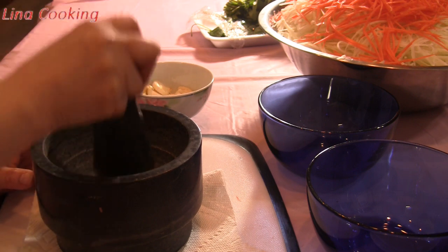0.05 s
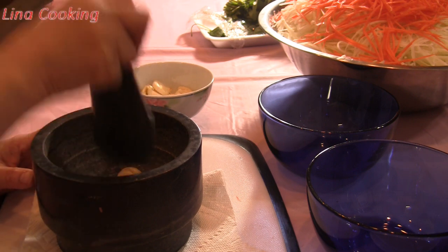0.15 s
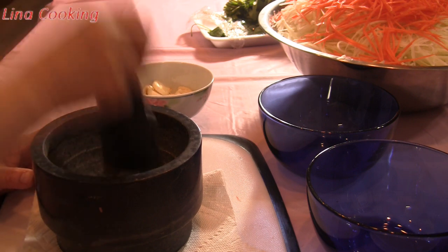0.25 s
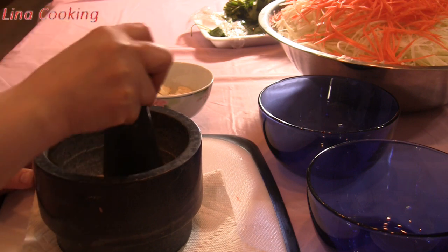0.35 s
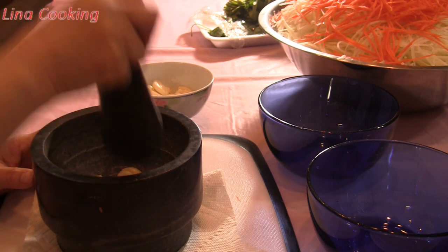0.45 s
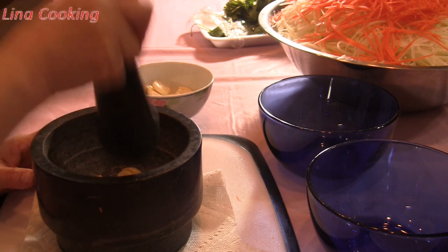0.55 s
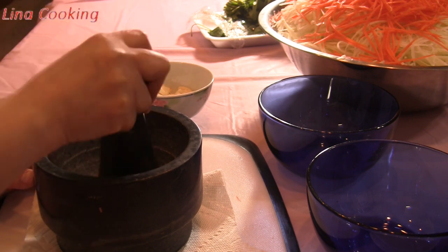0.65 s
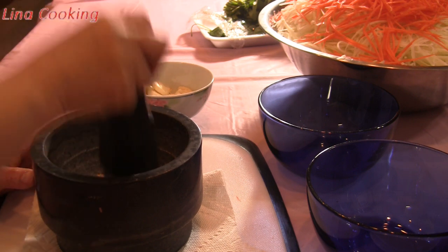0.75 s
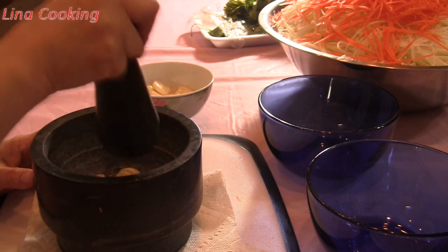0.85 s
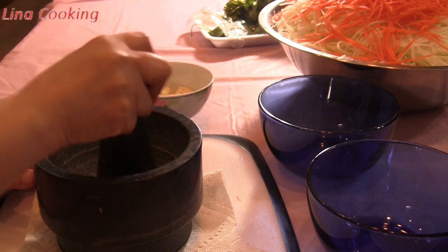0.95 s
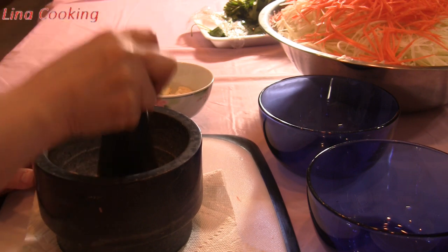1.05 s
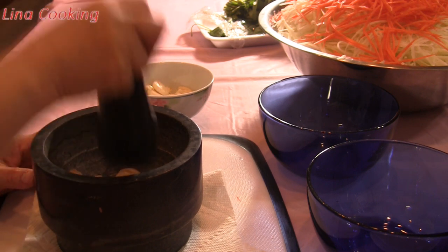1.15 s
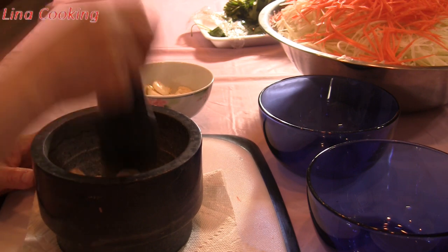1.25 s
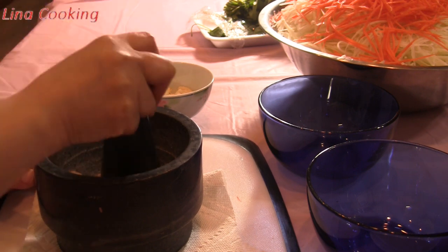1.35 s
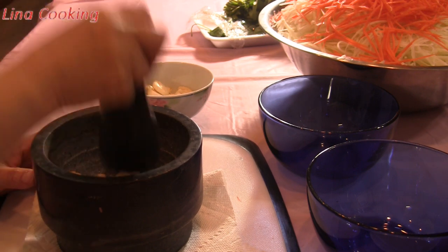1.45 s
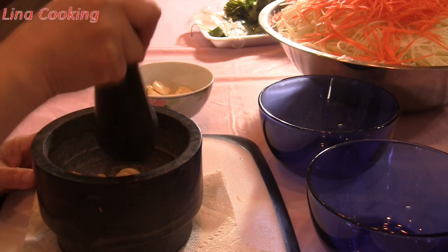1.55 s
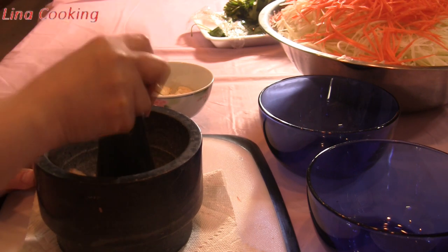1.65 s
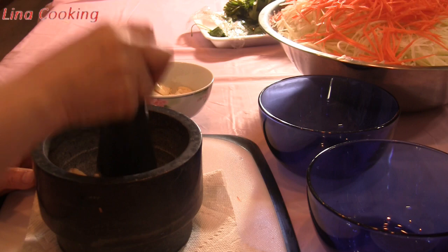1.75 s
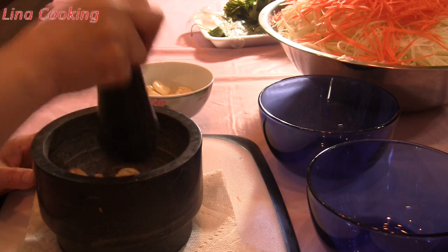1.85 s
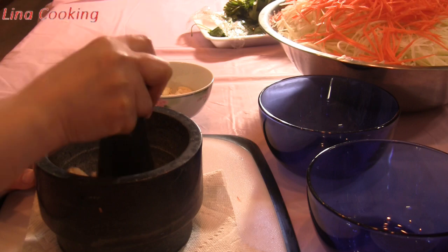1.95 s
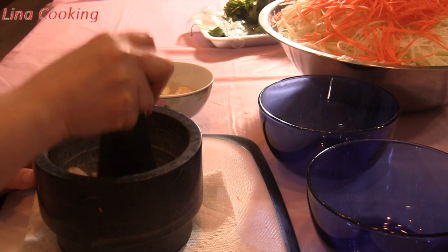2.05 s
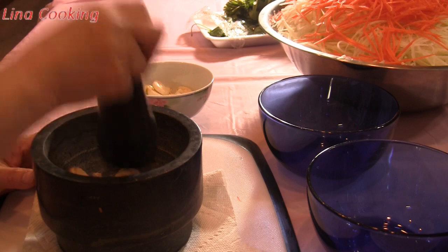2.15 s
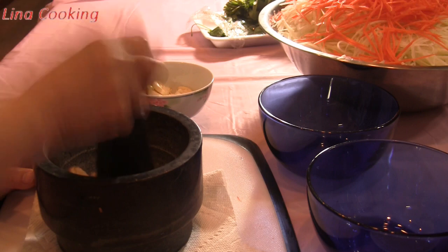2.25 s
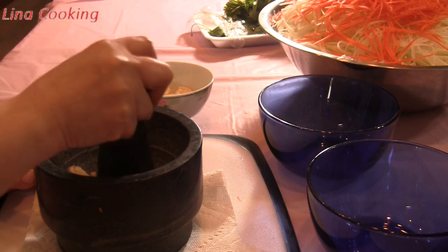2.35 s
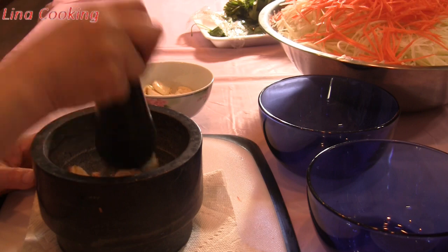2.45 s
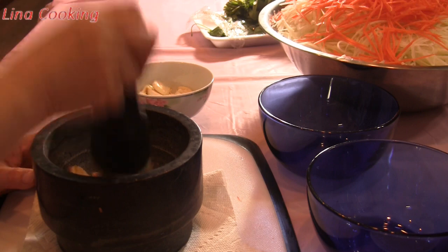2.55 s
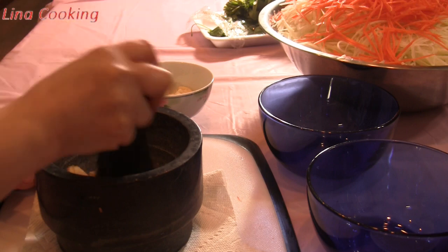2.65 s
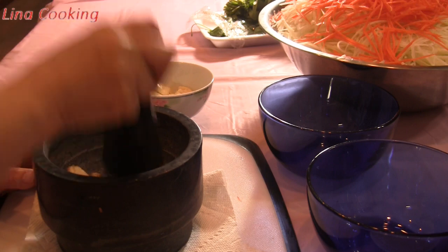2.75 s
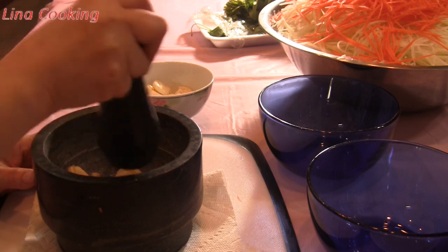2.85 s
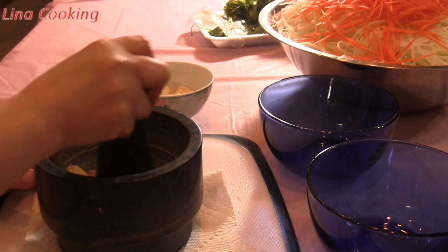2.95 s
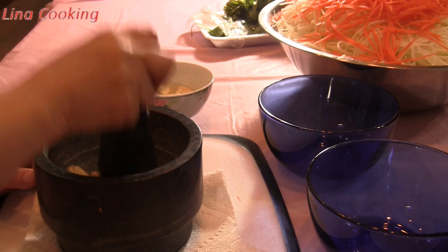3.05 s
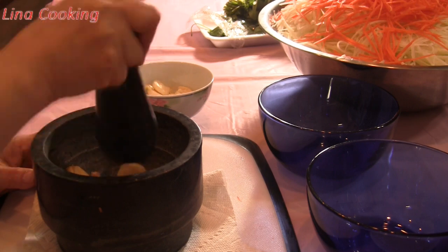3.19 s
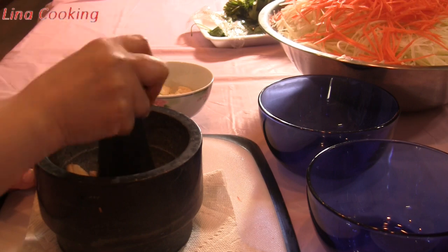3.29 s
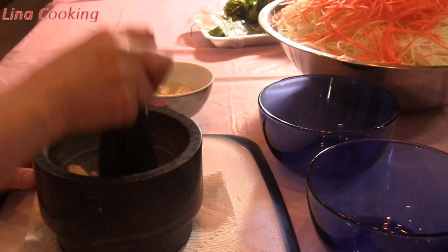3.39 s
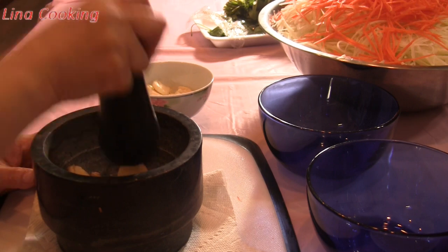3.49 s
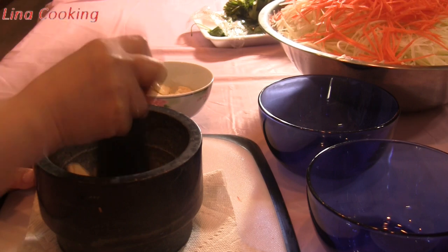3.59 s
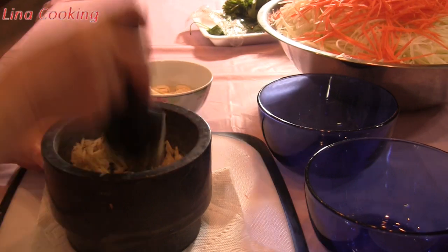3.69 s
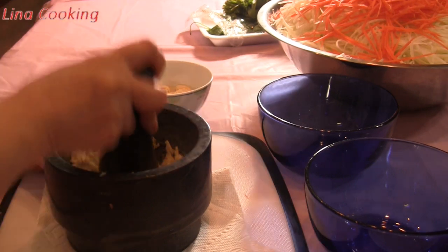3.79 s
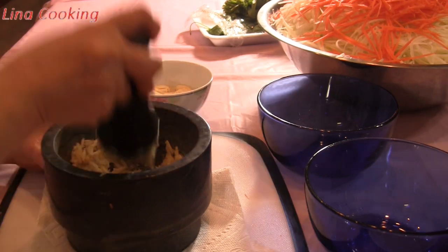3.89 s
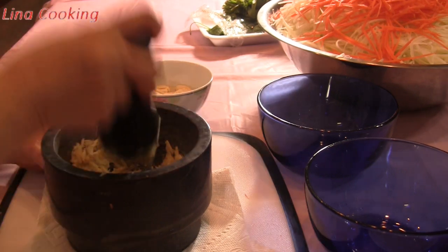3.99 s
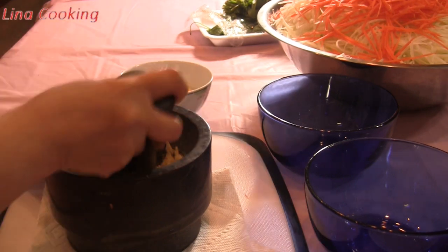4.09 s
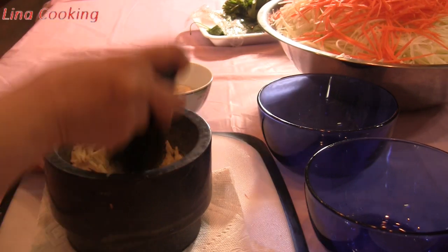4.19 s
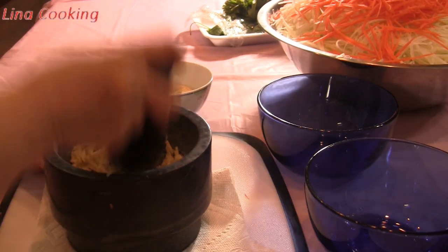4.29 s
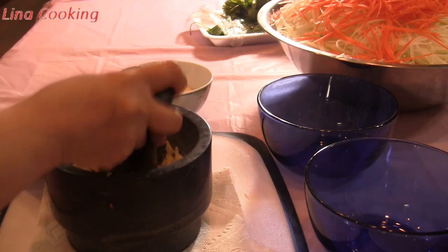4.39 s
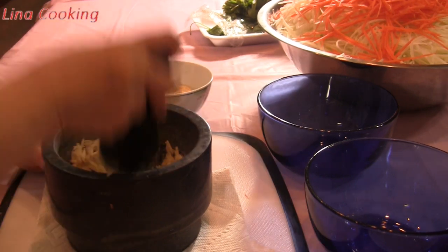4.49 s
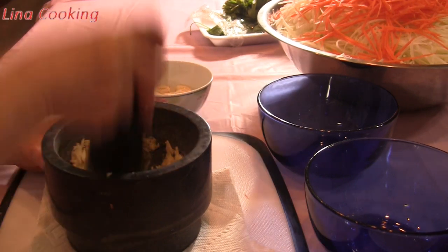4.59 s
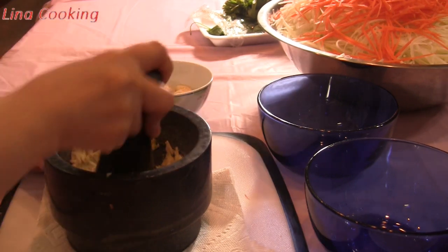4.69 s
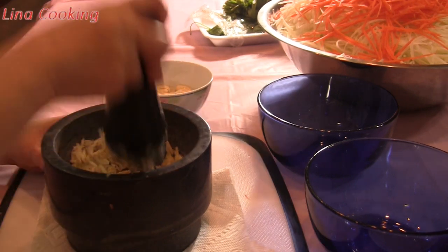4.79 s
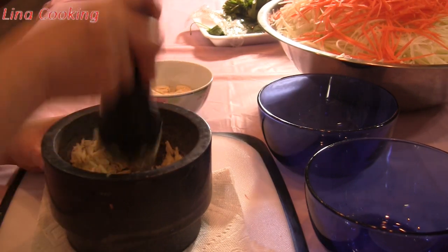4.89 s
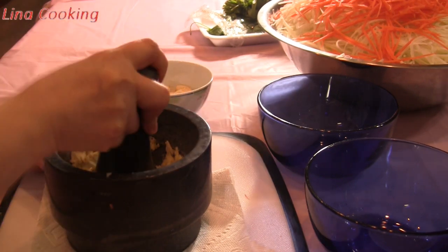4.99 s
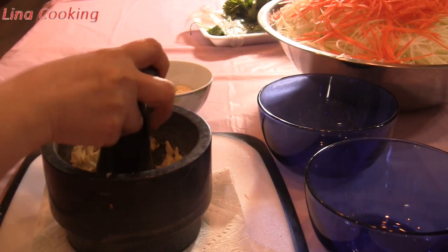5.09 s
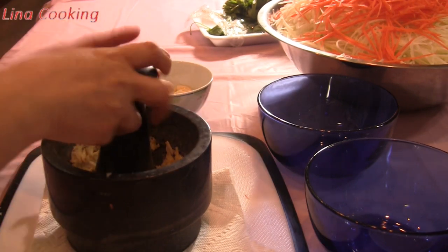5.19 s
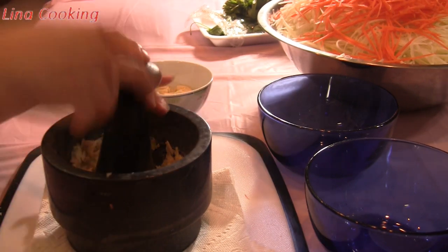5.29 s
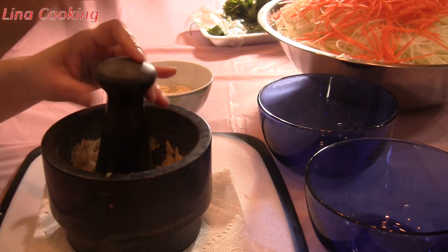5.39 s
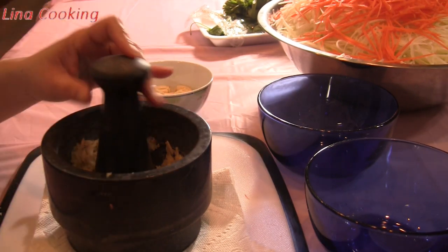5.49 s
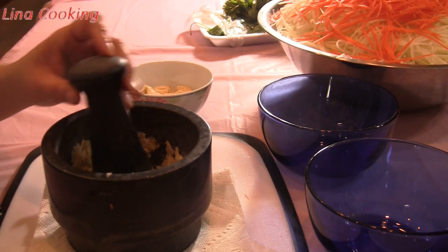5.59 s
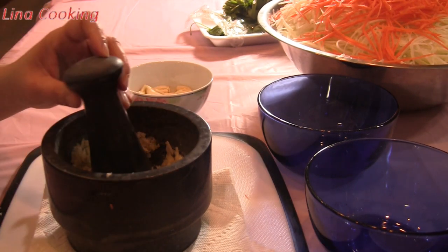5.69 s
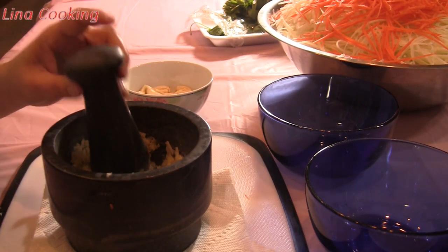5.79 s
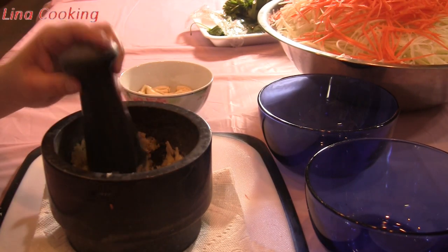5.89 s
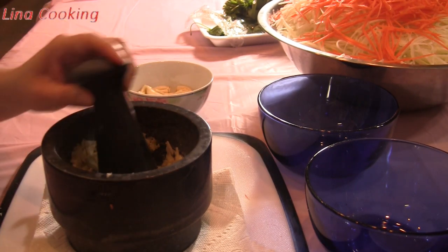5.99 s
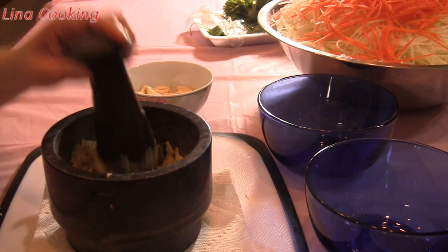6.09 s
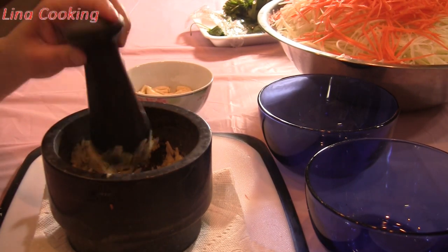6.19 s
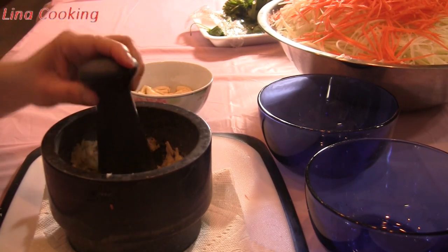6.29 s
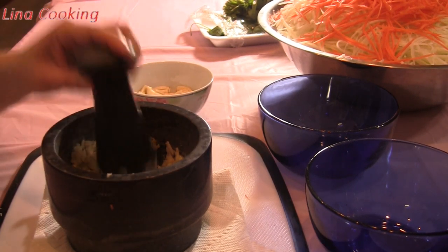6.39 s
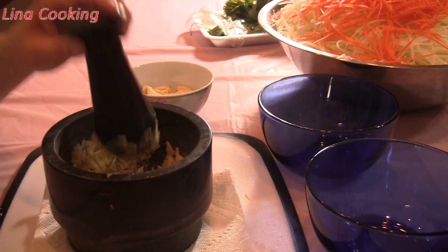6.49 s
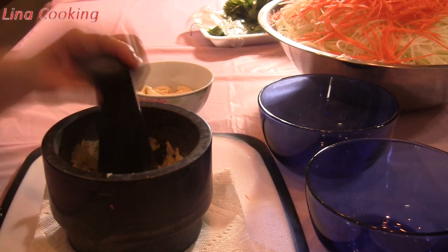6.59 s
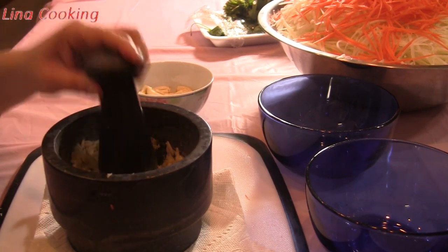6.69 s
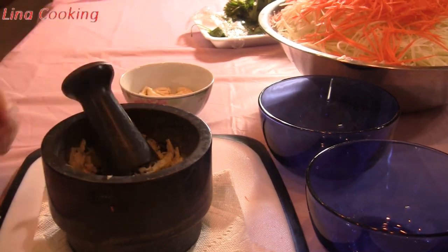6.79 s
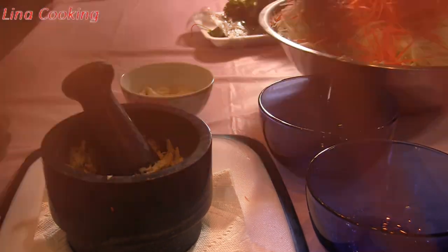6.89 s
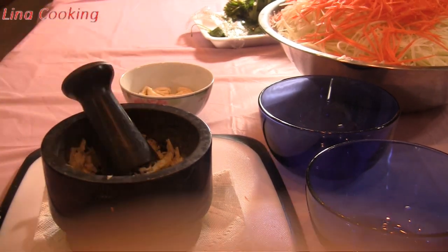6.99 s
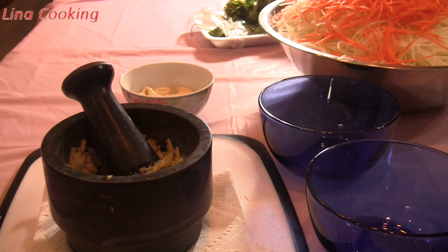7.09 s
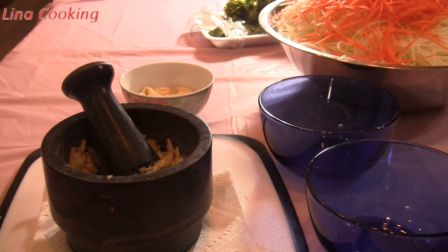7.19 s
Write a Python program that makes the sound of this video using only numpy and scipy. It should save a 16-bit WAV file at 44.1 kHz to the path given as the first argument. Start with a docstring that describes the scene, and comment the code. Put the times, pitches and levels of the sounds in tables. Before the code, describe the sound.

Steady pounding in a small live kitchen: moist garlic crunches under cushioned, woody-deep thuds that start soft and quickly grow heavy. Past the midpoint the rhythm loosens and bare stone strikes stone, sharp, clipped and ringing with a long room wash. Then quieter handling: wet slides, ticks against the bowl, two weaker blows, a final bright crack whose ring stops abruptly, and brief scrapes. Close stereo microphone, low room murmur and faint hiss.

```python
"""Garlic pounded in a stone mortar

A stone pestle pounds garlic in a heavy stone mortar on a kitchen table, close to a two-port microphone.
Each cushioned blow is a short wet crunch of noise grains and then a low thud of mortar and table as damped modes.
Four blows meet bare stone, crack loudly enough to overload the microphone (clipping) and ring on.
Between and after them come light taps, snaps and slides; at the end the pestle is leant against the rim.
Delayed copies give the echoes of cushioned blows, decaying noise gives the room, and steady noise the air."""
import sys
import numpy as np
from scipy import signal
from scipy.fft import rfft, irfft, next_fast_len
from scipy.io import wavfile
from scipy.ndimage import uniform_filter1d

SR = 44100
rng = np.random.default_rng(int(sys.argv[2]) if len(sys.argv) > 2 else 0)


def generate_wav(sig):
    """Save sig (samples, or channels by samples) to the path in sys.argv[1] as 16-bit PCM at SR."""
    pcm = np.round(np.clip(np.atleast_2d(sig).T, -1, 1) * 32767).astype(np.int16)
    wavfile.write(sys.argv[1], SR, pcm)


N = 319739
T = np.arange(N) / SR  # s

# Blows cushioned by garlic. Each row: landing in seconds, thud level in dB, contact time scale in ms,
# crunch level in dB before a common trim, resonance of the trapped air pocket in Hz.
BLOWS = [(.0385, -23.5, 3, -23.5, 2880), (.347, -12, 2.13, -25.5, 3060), (.6746, -6, 1.85, -20.5, 2950),
         (1.013, -1, 1.28, -23.5, 1790), (1.3589, -2, 1.28, -25, 3200), (1.6936, -1, 1.08, -23, 1660),
         (2.019, -1, 0.96, -22.5, 2960), (2.3353, -1, 0.89, -24.5, 3060), (2.6631, -6, 1.42, -30.5, 2040),
         (2.9984, -0.5, 1.04, -25, 1920), (3.3257, -1.5, .9, -21.5, 1760), (3.6582, -3, 1.21, -24, 1960),
         (4.094, -2, 0.88, -23, 3270), (4.6844, -9, 1.43, -24, 3960), (5.986, -17.5, 1.83, -32, 4500),
         (6.32, -14, 1.64, -24.5, 3200)]
# Blows of stone on stone. Each row: start in seconds, level in dB, contact time scale in ms, grit level in dB,
# pestle ring level in dB, level of wash and glass in dB, tilt of the wash in dB per octave.
CRACKS = [(3.7824, 6.5, 0.046, -22.5, -31.5, 0, -1.4), (4.4, 7.5, 0.062, -21, -25.5, 0, 0),
          (5.0047, 4.5, 0.089, -17.5, -39.5, -2.5, -3.5), (6.6626, -0.5, 0.043, -11.5, -21.5, -3, -0.5)]
# Pulp and stone sliding. Each row: centre in seconds, time from the centre to 1/e in seconds,
# wet hiss level in dB, stone rub level in dB.
SLIDES = [(5.64, .12, -52.5, -74), (5.894, 0.022, -46, -52.5), (6.007, 0.044, -43, -57),
          (7.089, 0.033, -53, -43), (7.181, 0.02, -41.5, -49), (7.229, 0.02, -49.5, -48)]
# Taps of the pestle on the wall of the bowl. Each row: time in seconds, level in dB.
TAPS = [(6.186, -46.5), (6.206, -51.5), (6.233, -48), (6.252, -39.5), (6.53, -31)]
# Bits of garlic snapping under the pestle. Each row: time in seconds, level in dB, centre in Hz.
SNAPS = [(.046, -30, 2800), (5.458, -47, 9000), (6.047, -47, 2470), (6.061, -46, 7000),
         (6.356, -42.5, 2010), (6.989, -42.5, 3300)]
# Modes of mortar, board and table under a thud. Each row: frequency in Hz, relative level in dB, t60 in seconds.
BOARD_MODES = [(84.6, -39, 0.84), (112.7, -26, 0.92), (135.95, -23, 0.427), (171, -28, 0.37),
               (195.7, -13, 0.077), (224, -24, 0.42), (235, -24, 0.51), (265, -27.5, 0.53),
               (328, -27, 0.49), (398, -18, 0.48), (455, -15.5, 0.44), (526, -25, .3)]
# Modes of the bare stone bowl. Each row: frequency in Hz, relative level in dB, t60 in seconds.
STONE_MODES = [(280, -17, 0.081), (450, -13.5, 0.021), (800, -11, 0.012), (1118, 8.5, 0.0065),
               (1360, 4, 0.0079), (2020, 1, 0.0075), (3150, -8, 0.012), (3700, -15.5, 0.0055)]
# Modes of the pestle. Each row: frequency in Hz, relative level in dB, t60 in seconds.
PESTLE_MODES = [(4102, -3, 0.33), (4105, -11.5, 0.54), (8280, -9.5, .2), (8280, -19.5, 0.9),
                (12500, -18, .3), (13080, -17.5, .3)]
# Glass bowls on the table, in sympathy with a crack. Each row: frequency in Hz, relative level in dB, t60 in seconds.
GLASS_MODES = [(970, -39.5, .7), (1136, -34.5, 1.0), (1198, -37, 0.98), (3190, -44, .9)]
# Air in the hollow of the bowl. Each row: frequency in Hz, relative level in dB, t60 in seconds.
HOLLOW_MODES = [(601, -33.5, 0.15), (658.3, -27, 0.18), (748.2, -24.5, 0.15), (823.6, -25.5, 0.075)]
# Surfaces that bounce sound back and forth. Each row: delay in ms, gain per bounce before dulling.
ECHOES = [(5.1, .2), (12.8, .32), (37, 0.26), (75, 0.11)]
# The kitchen after a cushioned blow or light contact. Each row: frequency in Hz, relative level in dB, t60 in seconds.
KITCHEN = [(100, -21.5, 0.39), (353, 6.5, 0.26), (716, -16, 0.32), (1497, -12.5, 0.33), (4164, -7, 0.43),
           (7850, -9, 0.46), (14870, -6.5, 0.17)]
# The long wash after a crack. Each row: frequency in Hz, relative level in dB, t60 in seconds.
WASH = [(80.7, 20, 0.66), (253, 26, 0.82), (450, 26, 1.18), (706, 18, 1.01), (1200, 24, 1.11),
        (1837, 15.5, 0.84), (3500, 12.5, 1.2), (5370, -0.5, 1.9), (8900, -4, 0.28), (14000, -15, .4)]
# Spectrum of crushed garlic and grit. Each row: frequency in Hz, relative level in dB per Hz.
CRUNCH_SPECTRUM = [(300, 3), (1000, -4.5), (2500, -1), (5000, 1.5), (8000, 3.5), (11000, -2.5), (15500, -7)]
# Spectrum of the kitchen's murmur. Each row: frequency in Hz, relative level in dB per Hz.
AIR_SPECTRUM = [(18, -12), (30, -2), (123, 2), (256, 1.5), (379, -9), (443, 0), (505, -7.5), (1080, -15.5),
                (2360, -18.5), (8280, -26), (12600, -31.5), (15500, -52.5)]

MURMUR_DB, HISS_DB = -49, -63  # rms levels of the air
TOP_HZ = 15700  # upper cut-off
BREAK_S = 6.863  # the last ring stops short here
FILLED_S, FILLED_DB = 3.7, -6  # shreds fill the bowl: its hollow answers less from here on
PULPED_S, PULPED_DB = 2.2, -7  # the cloves have broken up: their pulp muffles the knock from here on
# a slow pestle starts crushing earlier: lead at a thud of 0 dB, and more for each dB less
CRUNCH_LEAD_MS, LEAD_MS_PER_DB = 3.2, 0.21
# a thick cushion crunches longer: decay time at 1 ms of contact, and exponent of its growth with contact
CRUNCH_MS, CRUNCH_GROWTH = 2.2, 1.1
CRUNCH_TRIM_DB = -2
# squeezed-out air: level against the untrimmed crunch, width of its resonance
POCKET_DB, POCKET_WIDTH_HZ = -10.5, 620
# cloves go on giving way: envelope level at a thud of 0 dB, more for each dB less, decay in s
JUICE_DB, JUICE_PER_DB, JUICE_S = -17, 1.15, 0.013
# knock through the garlic: level at a 0 dB thud and 1 ms contact, dB per dB of thud, loss per further ms
KNOCK_DB, KNOCK_PER_DB, CUSHION_DB_PER_MS = -3, 1.5, 13.5


def undb(db):
    """Level: decibels become an amplitude ratio."""
    return 10 ** (np.asarray(db) / 20)


def unit(x):
    """Normalisation: scale to an rms of one."""
    return x / np.sqrt(np.mean(x ** 2))


def burst(x, db):
    """Energy level: scale a short sound so that its energy, spread over 10 ms, has this level."""
    return x * undb(db) / np.sqrt(np.sum(x ** 2) / (SR / 100))


def add(track, s, x):
    """Superposition: mix a sound into a track from time s on."""
    start = int(round(s * SR))
    x = x[..., max(-start, 0):N - start]
    first = max(start, 0)
    track[..., first:first + x.shape[-1]] += x


def lookup(hz, table, axis=1):
    """Interpolation of a table column along log frequency."""
    table = np.array(table, float)
    return np.interp(np.log(hz + 1e-9), np.log(table[:, 0]), table[:, axis])


def shape(x, response):
    """Linear filtering: multiply the spectrum by a gain given as a function of frequency."""
    n = next_fast_len(x.shape[-1], True)
    return irfft(rfft(x, n) * response(np.fft.rfftfreq(n, 1 / SR)), n)[..., :x.shape[-1]]


def resonate(x, hz, width_hz):
    """Damped resonance, applied twice for steep skirts."""
    return shape(x, lambda f: (1j * f * width_hz / (hz ** 2 - f ** 2 + 1j * f * width_hz)) ** 2)


def fade(t, t60):
    """Exponential decay: a fall of 60 dB in t60 seconds."""
    return np.exp(-np.log(1000) * t / t60)


def ring(modes):
    """Modal superposition: struck modes die away as damped sines."""
    t = T[:SR]
    return sum(undb(db) * fade(t, t60) * np.sin(2 * np.pi * hz * t) for hz, db, t60 in modes)


def strike(modes, contact_ms, baffle_hz=320):
    """Impact excitation: a longer bell-shaped push is duller, and a small bowl radiates little bass."""
    push_ms = T[:SR // 100] * 1000
    force = np.exp(-.5 * (push_ms / contact_ms - 2) ** 2)
    rung = signal.fftconvolve(force / force.sum(), ring(modes))[:SR]
    return shape(rung, lambda f: 1j * f / (baffle_hz + 1j * f))


def grains(envelope, spread_db):
    """Granular noise: dense tiny bursts of very unequal size under an envelope."""
    n = len(envelope)
    sizes_db = np.minimum(spread_db * rng.exponential(size=n), 20)
    return envelope * rng.standard_normal(n) * undb(sizes_db)


def diffuse(n, apart_hz=1700):
    """Diffuse-field coherence: stereo noise, alike in the bass and unrelated in the treble."""
    mid, side = rng.standard_normal((2, n))

    def turn(f):
        return np.pi / 4 * np.minimum(f / apart_hz, 1)

    common = shape(mid, lambda f: np.cos(turn(f)))
    opposed = shape(side, lambda f: np.sin(turn(f)))
    return common + np.array([[1], [-1]]) * opposed


def air():
    """Stationary background noise: the low murmur of the kitchen and a faint even hiss."""
    murmur = unit(shape(diffuse(N), lambda f: undb(lookup(f, AIR_SPECTRUM))))
    return undb(MURMUR_DB) * murmur + undb(HISS_DB) * unit(diffuse(N))


def clumps(n, spread_db=3.0, size=64):
    """Clustered fracture: cells give way in clumps, a random level every millisecond or so."""
    levels = np.repeat(rng.standard_normal(n // size + 1), size)[:n]
    return uniform_filter1d(undb(spread_db * levels), size // 2)


def crunches(spread_db=4.5, rise_share=0.68):
    """Progressive fracture: cells burst in a growing crowd, trapped air is squeezed out and juice fizzes after."""
    out = np.zeros(N)
    t = T[:SR // 5] - 1 / 20  # zero at the peak of the crunch
    for s, thud_db, contact_ms, db, pocket_hz in BLOWS:
        lead_ms = CRUNCH_LEAD_MS - LEAD_MS_PER_DB * thud_db
        length_ms = CRUNCH_MS * contact_ms ** CRUNCH_GROWTH
        squeeze = np.exp(-abs(t) * 1000 / (length_ms * np.where(t < 0, rise_share, 1)))
        juice = undb(JUICE_DB - JUICE_PER_DB * thud_db) * (t > 0) * np.exp(-abs(t) / JUICE_S)
        envelope = (squeeze + juice) * clumps(len(t))
        cells = shape(grains(envelope, spread_db), lambda f: undb(lookup(f, CRUNCH_SPECTRUM)))
        pocket = resonate(grains(envelope, spread_db), pocket_hz, POCKET_WIDTH_HZ)
        crunch = burst(cells, db + CRUNCH_TRIM_DB) + burst(pocket, db + POCKET_DB)
        add(out, s - lead_ms / 1000 - 1 / 20, crunch)
    return out


def knocks(contact_ms=0.29, lead_s=.0016):
    """Transmission through a cushion: a firm blow reaches the stone, and each stirs the air in the bowl."""
    out, knock, hollow = np.zeros(N), strike(STONE_MODES, contact_ms), ring(HOLLOW_MODES)
    for s, thud_db, cushion_ms, *_ in BLOWS:
        cushion_db = CUSHION_DB_PER_MS * (cushion_ms - 1)
        knock_db = KNOCK_DB + KNOCK_PER_DB * thud_db - cushion_db + PULPED_DB * (s > PULPED_S)
        hollow_db = thud_db + FILLED_DB * (s > FILLED_S)
        add(out, s - lead_s, undb(hollow_db) * hollow - undb(knock_db) * knock)  # opposite polarity
    return out


def thuds(load=1.07, release=0.71, slope_gain=0.58):
    """Force pulse: the slope of the pestle's push radiates at once, and the push leaves the board ringing."""
    out, board = np.zeros(N), ring(BOARD_MODES)
    ms = (T[:SR // 50] - 1 / 100) * 1000  # zero at the peak of the push
    for s, db, contact_ms, *_ in BLOWS:
        # the garlic yields slowly, the stone rebounds faster
        width_ms = contact_ms * np.where(ms < 0, load, release)
        force = np.exp(-.5 * (ms / width_ms) ** 2)
        slope = -np.gradient(force)
        add(out, s - 1 / 100, undb(db) * slope_gain * slope / slope.max())
        add(out, s - 1 / 100, undb(db) * signal.fftconvolve(force / force.sum(), board))
    return out


def ports(x, lead_rad=2.36, knee_hz=4500):
    """Interchannel phase: the left port leads, by a phase that grows towards lead_rad in the treble."""
    right = shape(x, lambda f: np.exp(-1j * lead_rad * f / (f + knee_hz)))
    return np.array([x, right])


def reflect(x, dull_hz=800, count=3):
    """Repeated reflection: table, wall and ceiling return the sound a few times, duller."""
    out = np.zeros(N)
    for ms, gain in ECHOES:
        for bounce in range(1, count + 1):
            add(out, bounce * ms / 1000, gain ** bounce * x)
    return shape(out, lambda f: 1 / np.sqrt(1 + (f / dull_hz) ** 2))


def boom(x, db=-6, t60=0.49, build_s=0.039, low_hz=110):
    """Room response by convolution: low standing waves, as decaying noise, answer every thud in the same way."""
    t = T[:SR]
    response = diffuse(SR) * fade(t, t60) * (1 - np.exp(-t / build_s))
    response = response * np.sqrt(2) / np.linalg.norm(response)
    response = shape(response, lambda f: 1j * f / (low_hz + 1j * f))
    return undb(db) * signal.fftconvolve(x[None], response, axes=1)[:, :N]


def smooth(energy, s):
    """Energy storage: a one-pole average with time constant s."""
    keep = np.exp(-1 / (s * SR))
    return signal.lfilter([1 - keep], [1, -keep], energy)


def reverberate(x, bands, build_s):
    """Statistical reverberation: the room stores each band's energy and returns it as smooth, dying noise."""
    noise, tail = diffuse(N), 0
    edges = np.geomspace(70, 17000, 13)  # Hz
    for low, high in zip(edges, edges[1:]):
        hz = np.sqrt(low * high)
        band = signal.butter(2, [low, high], "band", fs=SR, output="sos")
        energy = signal.sosfilt(band, x + 1e-9 * noise[0]) ** 2  # a trace of noise keeps the filter active
        stored = smooth(smooth(energy, build_s), lookup(hz, bands, axis=2) / np.log(1e6))
        # triangular bands in log frequency overlap their neighbours
        carrier = shape(noise, lambda f: np.maximum(1 - abs(np.log((f + 1) / hz)) / np.log(high / low), 0))
        carrier = carrier / np.sqrt(2 * (high - low) / SR)
        tail = tail + undb(lookup(hz, bands)) * np.sqrt(stored) * carrier
    return tail


def touch(s, db, hz, width_hz, ms):
    """Light contact: a quick rise and a slower fall of grains excite one resonance."""
    out = np.zeros(N)
    t = T[:SR // 5] - 1 / 20
    envelope = np.exp(-abs(t) * 1000 / ms * np.where(t < 0, 2, .5))  # rises in ms / 2, falls in 2 ms
    add(out, s - 1 / 20, burst(resonate(grains(envelope, 2.9), hz, width_hz), db))
    return out


def snaps(ms=1.2, width_share=0.95):
    """Brittle fracture: bits of garlic snap as short broad resonances."""
    return sum(touch(s, db, hz, width_share * hz, ms) for s, db, hz in SNAPS)


def shimmer(db=-17, width_share=.04, t60=.65):
    """Scattering: the room spreads the pestle's ring into a rough narrow band round each mode."""
    noise = diffuse(SR)
    bands = sum(undb(mode_db) * unit(resonate(noise, hz, width_share * hz)) for hz, mode_db, _ in PESTLE_MODES)
    return undb(db) * bands * fade(T[:SR], t60)


def cracks(grit_lead_s=.0005, grit_s=.00081):
    """Hard impact: grit gives way, then stone meets stone and rings mortar, pestle, glass and room."""
    direct, send, scattered = np.zeros(N), np.zeros(N), np.zeros((2, N))
    t = T[:SR // 50] - 1 / 100
    click = signal.unit_impulse(len(t), "mid")
    pestle, halo, glass = ring(PESTLE_MODES), shimmer(), ring(GLASS_MODES)
    for s, db, contact_ms, grit_db, ring_db, wash_db, tilt_db in CRACKS:
        grit = grains(np.exp(-abs(t) / grit_s), 3.1)
        grit = shape(grit, lambda f: undb(lookup(f, CRUNCH_SPECTRUM)))
        add(direct, s - grit_lead_s - 1 / 100, burst(grit, grit_db))
        stone = undb(db) * strike(STONE_MODES, contact_ms)
        add(direct, s, stone + undb(ring_db) * pestle + undb(wash_db) * glass)
        add(scattered, s, undb(ring_db) * halo)
        # the impulse that sets off the wash, tilted about 900 Hz
        tilted = shape(click, lambda f: undb(wash_db + tilt_db * np.log2((f + 300) / 1200)))
        add(send, s - 1 / 100, tilted)
    break_off = np.clip((BREAK_S - T) / 0.0019, 0, 1)  # the last ring and its wash end abruptly
    return (ports(direct) + scattered + reverberate(send, WASH, .0014)) * break_off


def slides(rub_hz=580, rub_width_hz=160, rasp_db=-9):
    """Sliding friction: wet pulp hisses under the pestle; dry stone rubs with a hollow note and a rasp."""
    wet = grains(np.ones(N), 5.9)
    hiss = unit(shape(wet, lambda f: undb(lookup(f, CRUNCH_SPECTRUM)) * f / (f + 3000)))
    friction = grains(np.ones(N), 4.4)
    rasp = unit(resonate(friction, 1960, 1200))
    rub = unit(resonate(friction, rub_hz, rub_width_hz)) + undb(rasp_db) * rasp
    out = np.zeros(N)
    for s, length_s, wet_db, rub_db in SLIDES:
        swell = np.exp(-((T - s) / length_s) ** 2)
        out += swell * (undb(wet_db) * hiss + undb(rub_db) * rub)
    return out


def mortar_shift():
    """Friction excitation: the mortar shifts once on its board, a low broad resonance."""
    return touch(s=5.772, db=-34.5, hz=354, width_hz=350, ms=19)


def taps(tick_db=-10):
    """Light impact: the pestle taps the wall of the bowl, a hollow resonance with a gritty tick."""
    out = np.zeros(N)
    for s, db in TAPS:
        out += touch(s, db, hz=880, width_hz=630, ms=2.3)
        out += touch(s, db + tick_db, hz=3200, width_hz=5500, ms=1.2)
    return out


def scene(light_room_db=-10):
    """Direct and reverberant fields: all contacts sound through the room, and cushioned blows also echo."""
    low = thuds()
    bright = crunches() + knocks()
    light = snaps() + slides() + mortar_shift() + taps()
    room = boom(low) + reverberate(bright + undb(light_room_db) * light, KITCHEN, 0.0051)
    near = ports(low + bright + light + reflect(low + bright))
    return near + room + cracks() + air()


def record(dry, right_db=4.5, even_hz=3500, low_cut_hz=62):
    """Microphone response: less deep bass, a right port stronger below the treble, overload, and a cut top."""
    balanced = shape(dry, lambda f: undb(np.array([[-.5], [.5]]) * right_db / (1 + (f / even_hz) ** 2)))
    low_cut = signal.butter(2, low_cut_hz, "high", fs=SR, output="sos")
    overloaded = np.clip(signal.sosfilt(low_cut, balanced), -1, 1)
    top_cut = signal.ellip(8, .2, 70, TOP_HZ, fs=SR, output="sos")
    return signal.sosfilt(top_cut, overloaded)


dry = scene()
out = record(dry)
generate_wav(out)
```